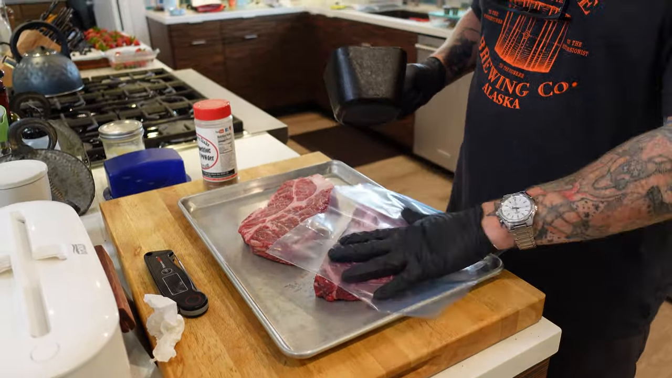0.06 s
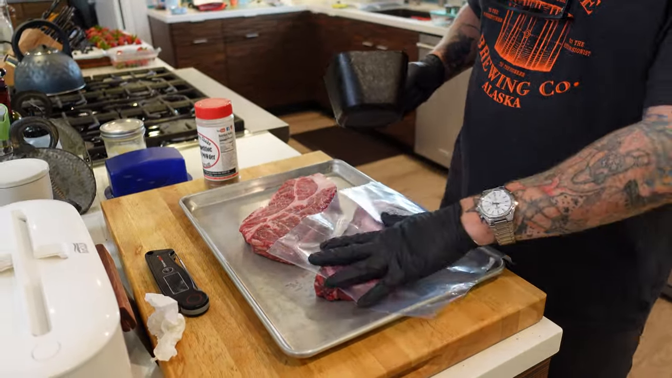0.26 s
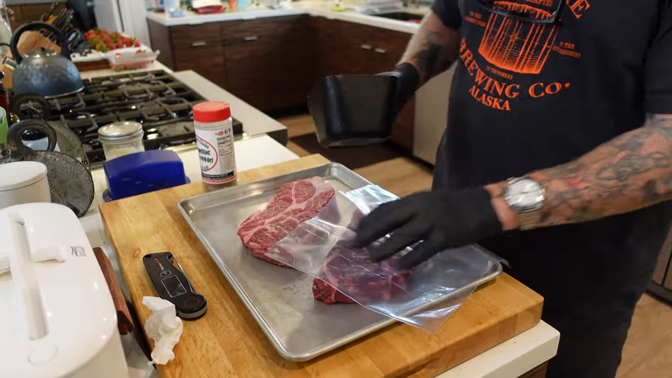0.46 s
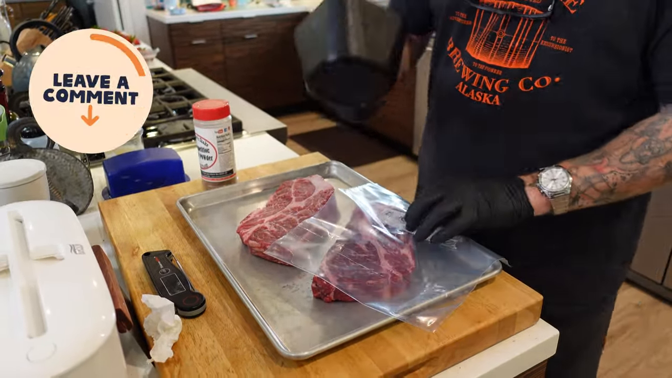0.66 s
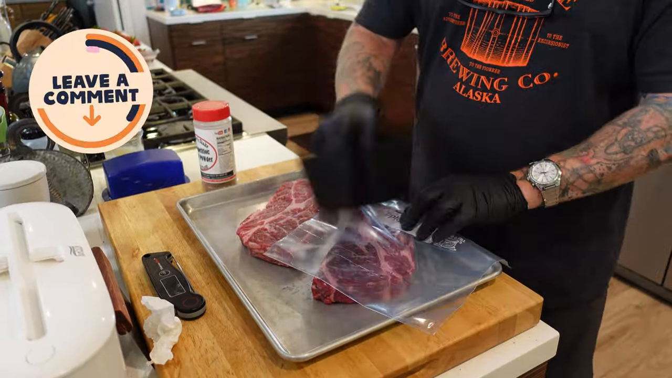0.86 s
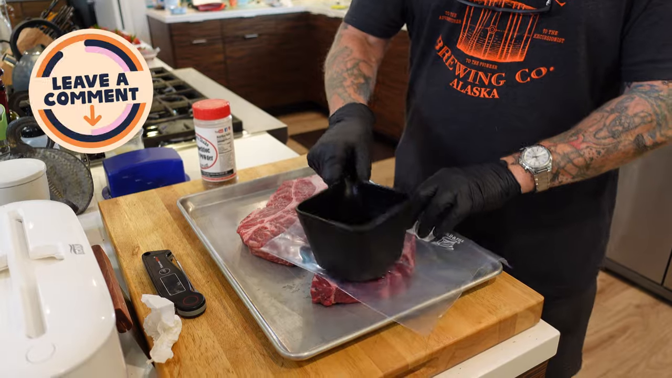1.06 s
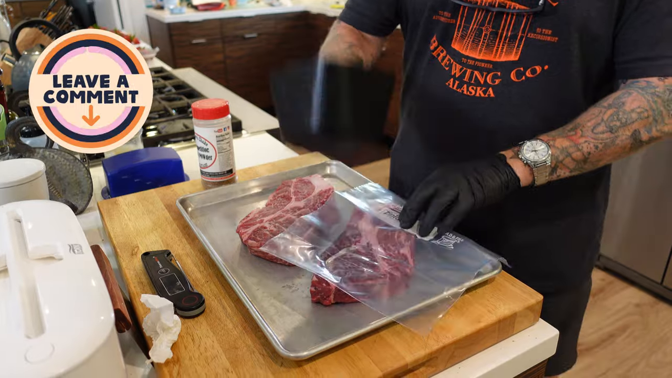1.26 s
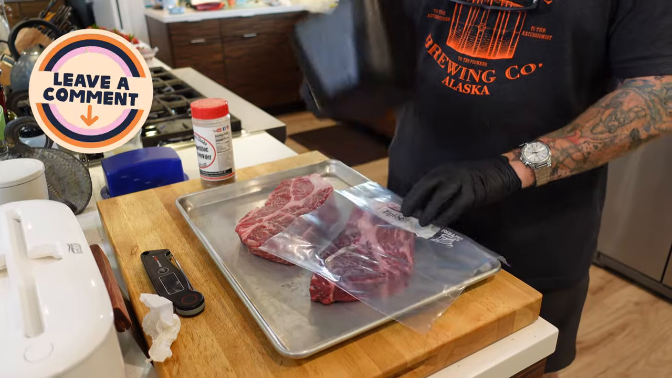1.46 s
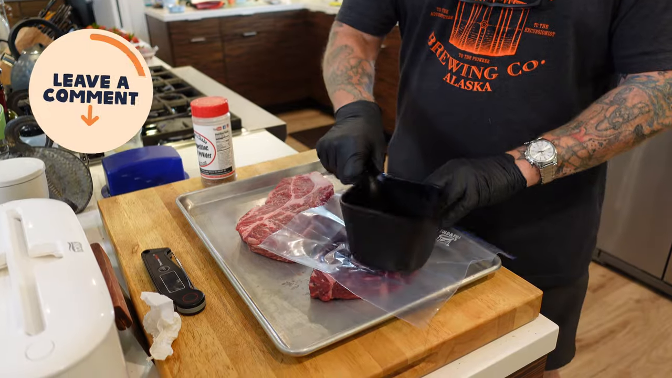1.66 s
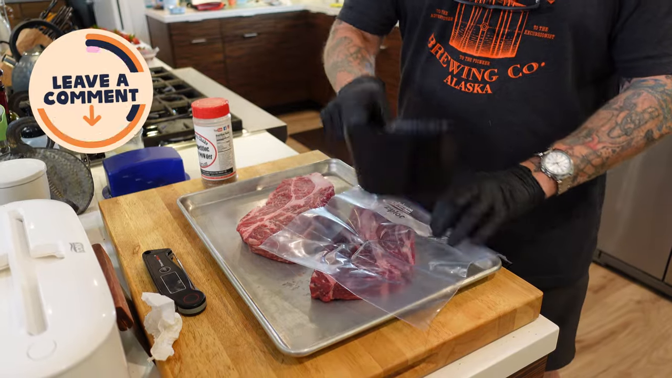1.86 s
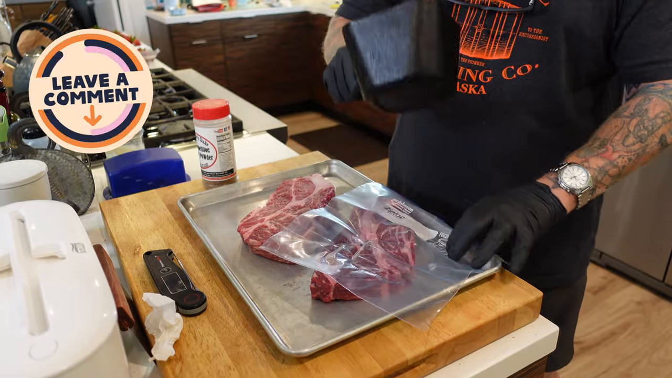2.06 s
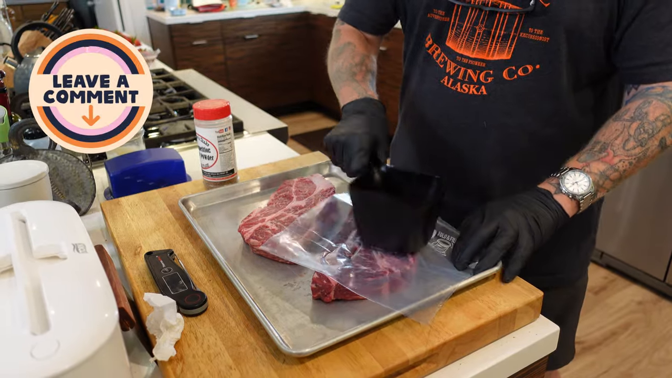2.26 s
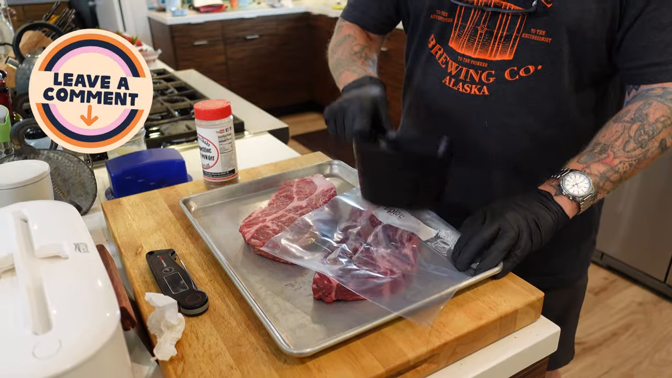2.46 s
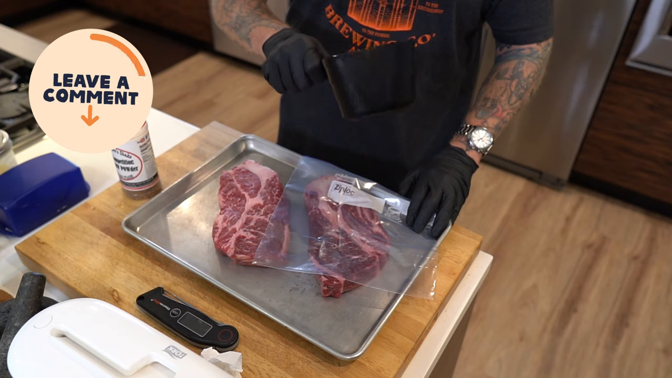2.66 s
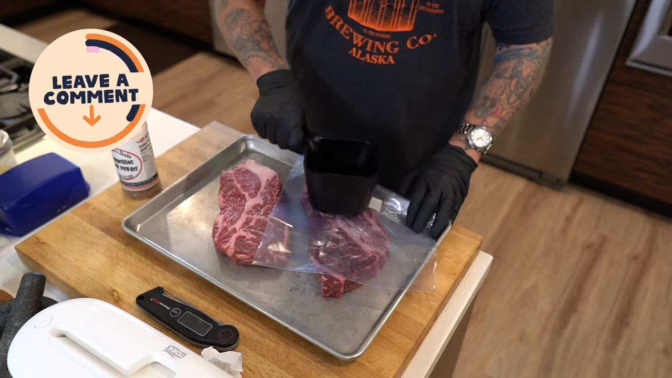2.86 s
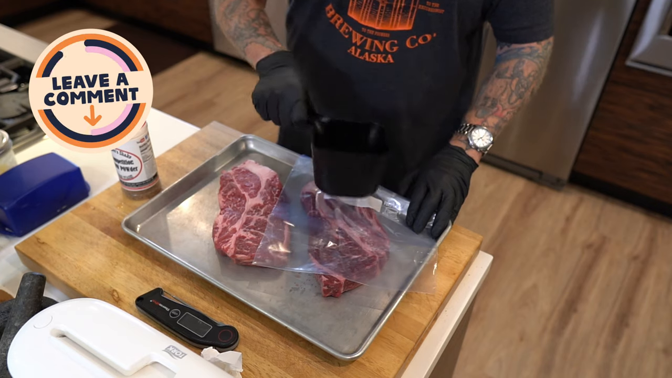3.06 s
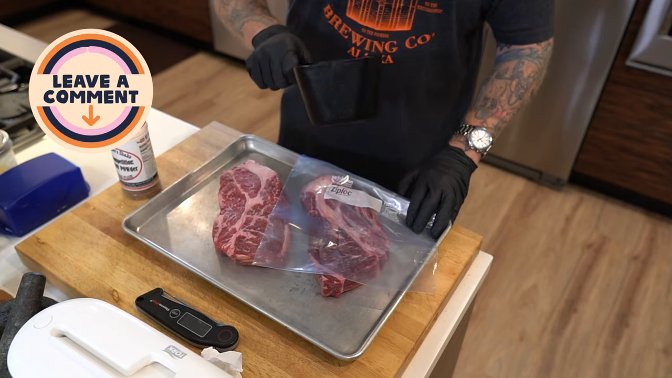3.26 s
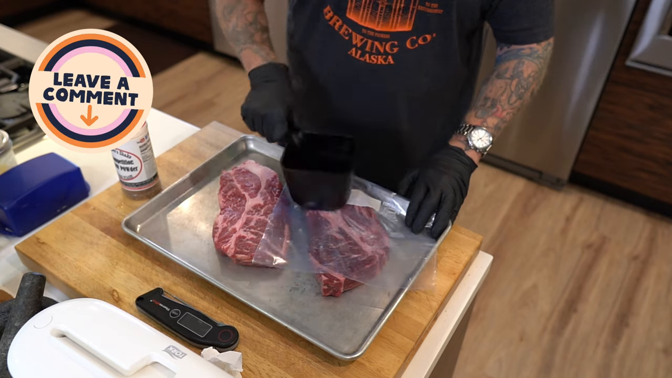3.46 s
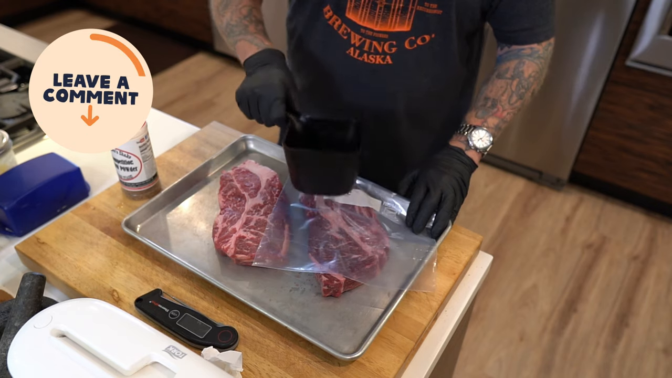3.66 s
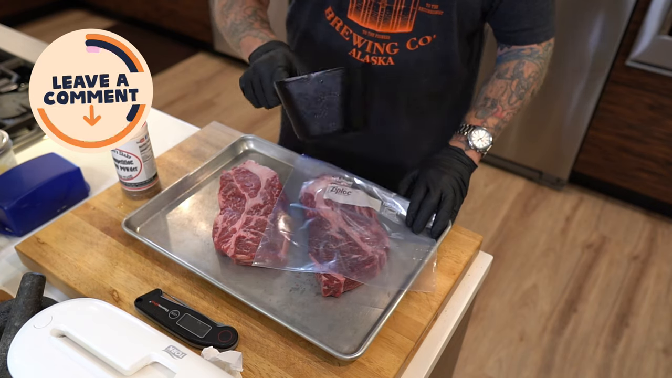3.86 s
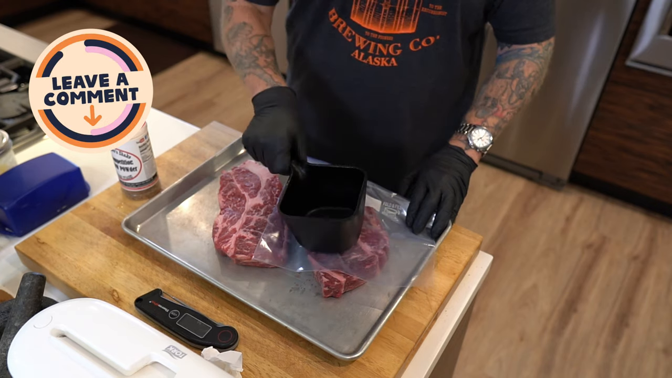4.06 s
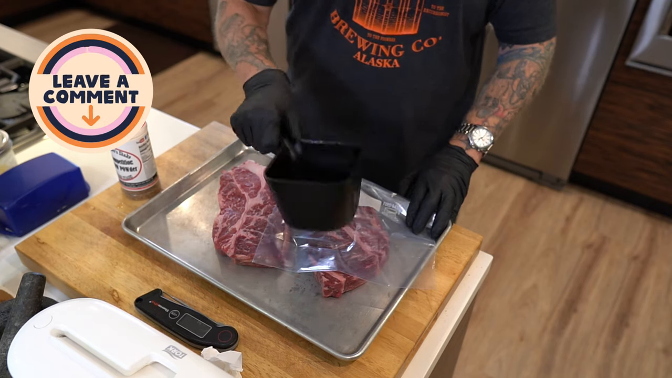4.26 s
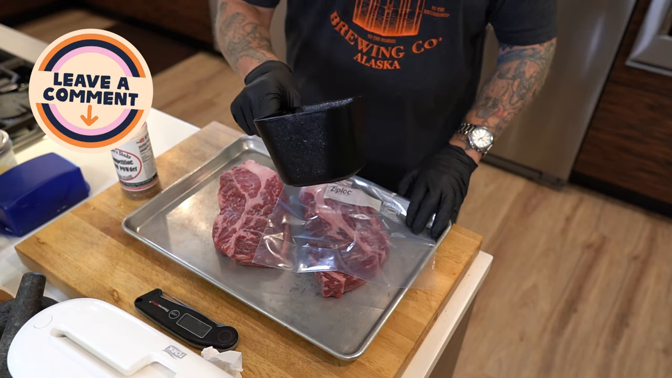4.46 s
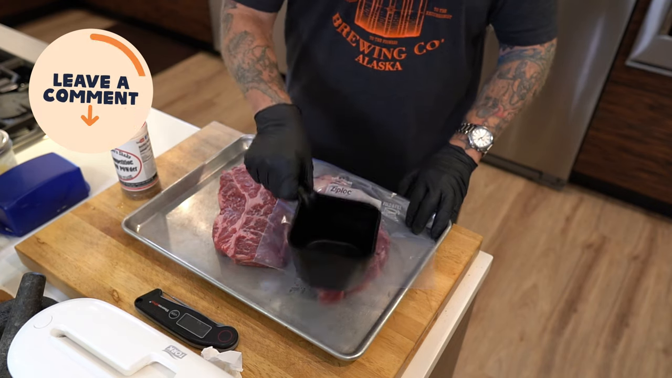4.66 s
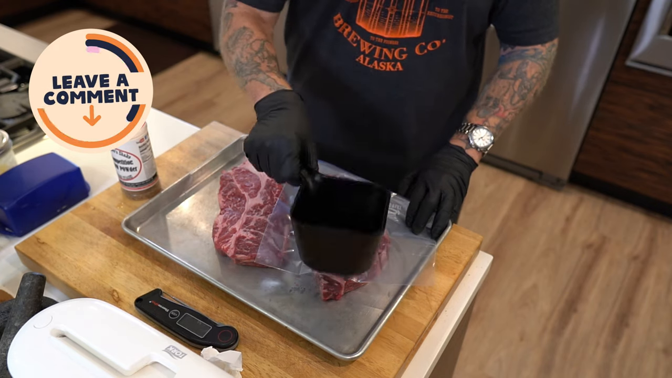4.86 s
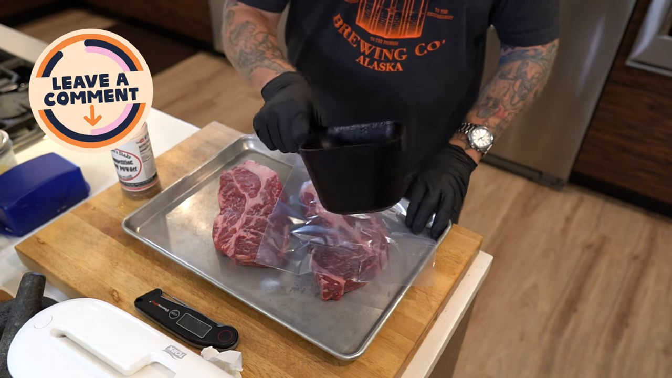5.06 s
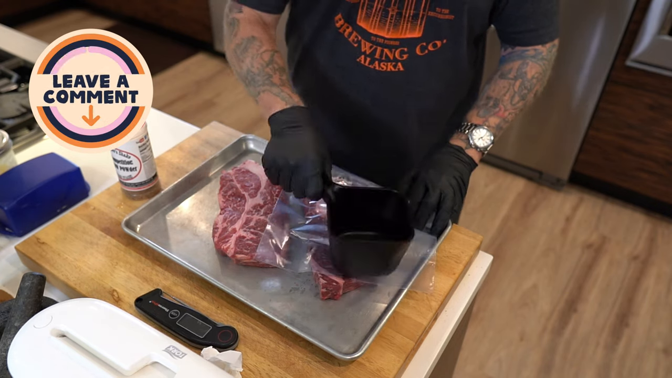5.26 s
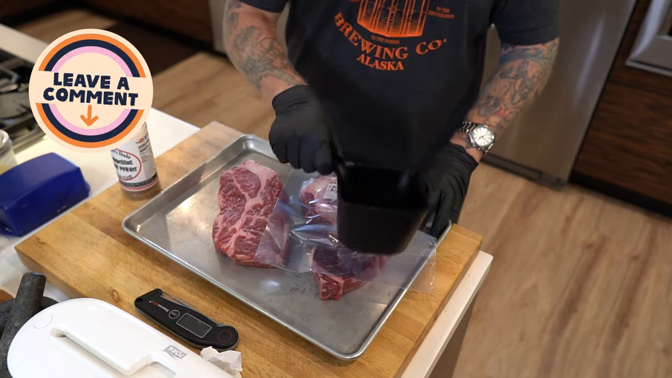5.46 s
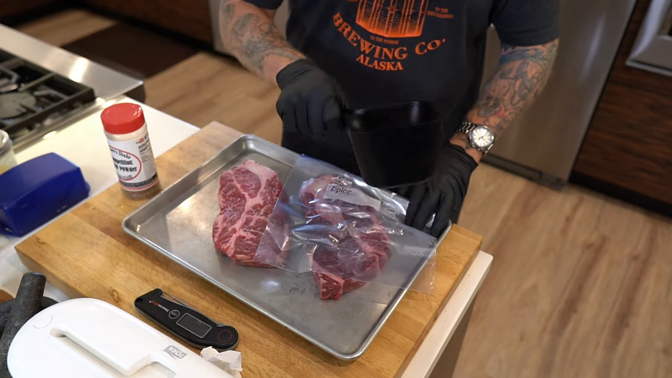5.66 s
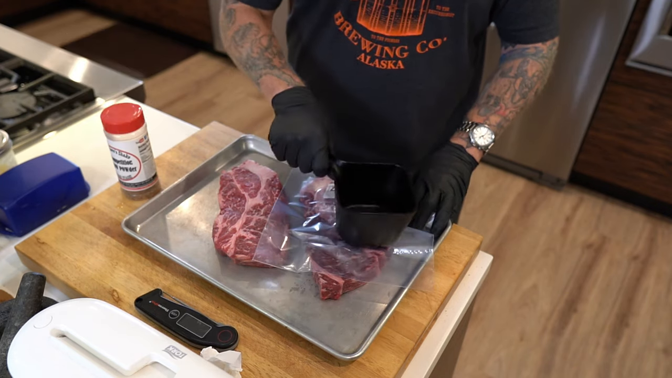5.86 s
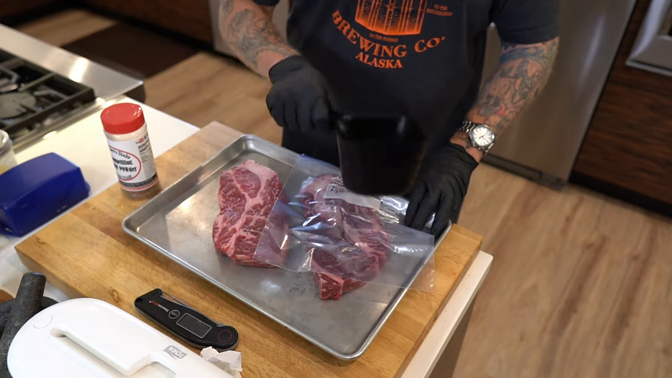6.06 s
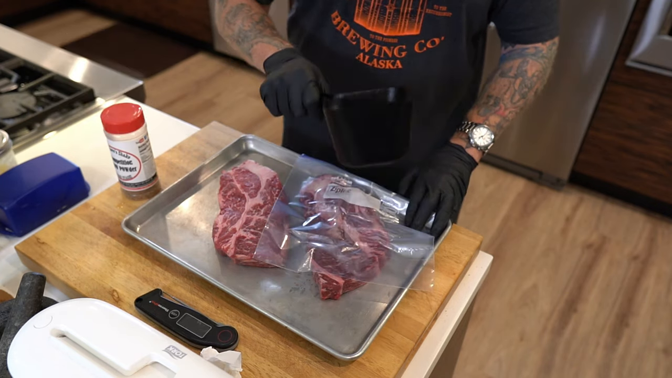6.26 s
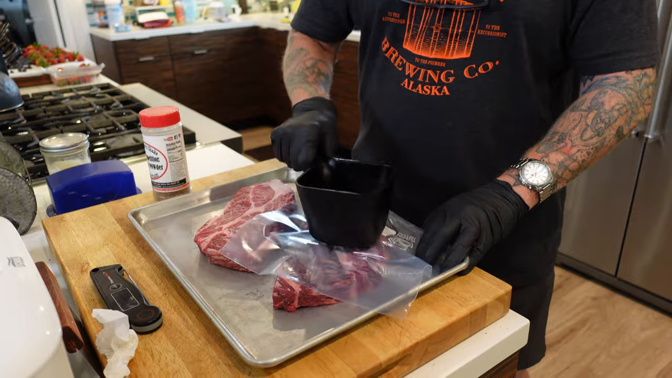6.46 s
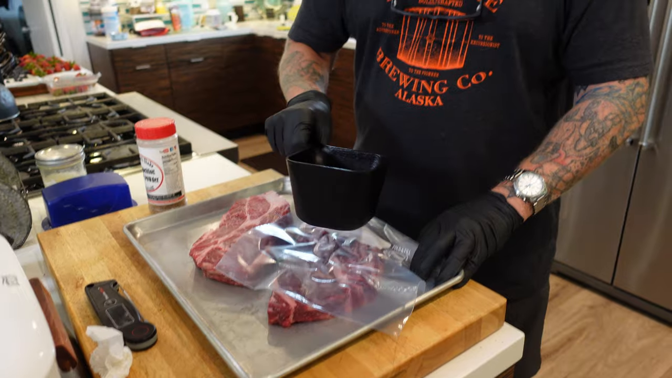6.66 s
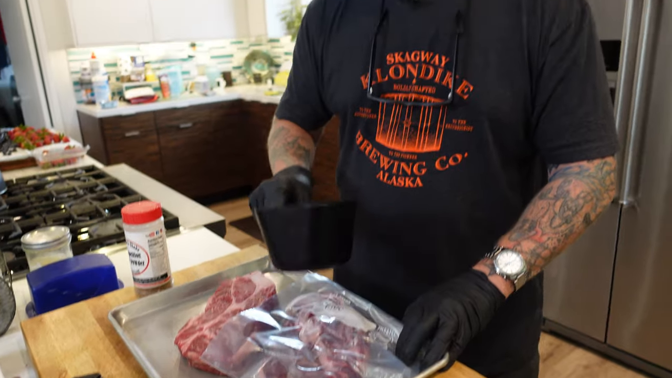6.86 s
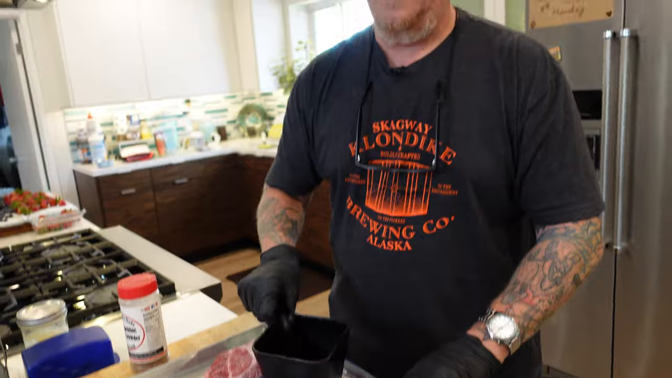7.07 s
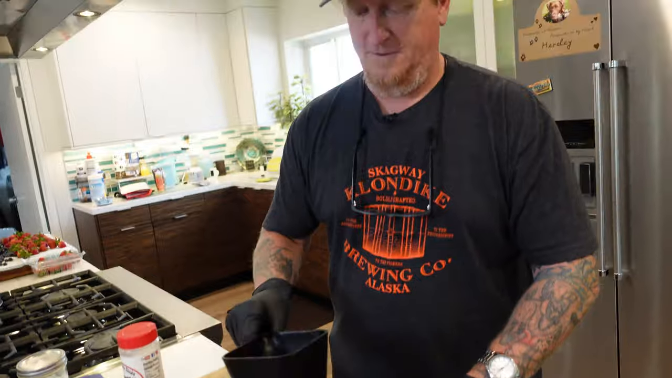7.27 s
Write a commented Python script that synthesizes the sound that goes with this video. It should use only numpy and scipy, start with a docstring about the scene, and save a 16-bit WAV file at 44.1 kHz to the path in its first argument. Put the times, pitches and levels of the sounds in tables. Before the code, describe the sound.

A quiet kitchen with a low, steady background rush is heard from close by. In the first half second a gloved hand rustles over a plastic bag, with small crinkles and a soft bump of the wooden board. At about 0.9 seconds an iron pot starts pounding bagged steaks on a metal sheet pan. Eleven heavy blows fall evenly, about 0.6 seconds apart, the last near 6.9 seconds and the hardest near 3.4. Each combines a crack of plastic, a clap of trapped air, a dull meaty smack, a damped pan knock and a low boom from the counter, with a faint iron ring and short room reverberation. The bag crinkles between hits, most clearly around 2.1, 5.3 and 6.5 seconds. From about 5.7 seconds a faint, thin, whistling hiss flutters underneath, spurting briefly around 6.2 seconds and lasting until the end at about 7.4 seconds.

```python
"""A glove rustles over a plastic bag in a quiet kitchen; then come eleven evenly paced, heavy blows.
An iron pot pounds bagged steaks on a sheet pan that lies on a wooden board. Each impact crushes the
film, claps out the trapped air, smacks the meat and excites damped modes of pan, pot, board and counter.
The room reverberates, the bag crinkles between blows, and a thin hiss sets in near the end."""
import sys
import numpy as np
from scipy import signal
from scipy.fft import rfft, irfft, next_fast_len
from scipy.io import wavfile
from scipy.ndimage import uniform_filter1d

SR = 44100
rng = np.random.default_rng(int(sys.argv[2]) if len(sys.argv) > 2 else 0)


def put_to_file(sound):
    """Save the sound as 16-bit audio at rate SR, in the file named by the first command-line argument."""
    columns = np.atleast_2d(sound).T  # one column per channel
    safe = np.clip(columns, -1, 1)
    whole_steps = np.round(safe * 32767)
    wavfile.write(sys.argv[1], SR, whole_steps.astype(np.int16))


N = 322646

# Spectral shapes (f/Hz, relative density/dB)
RUSH_SPECTRUM = [(25, -2), (60, -2), (85, -8.5), (120, 1), (168, 1), (195, -16), (228, 1), (277, -9.5),
                 (347, -4.5), (400, -10.5), (1400, -19.5), (2670, -29), (3950, -30.5), (5700, -32),
                 (11000, -33.5), (16000, -38.5)]
GLOVE_SPECTRUM = [(180, -23.5), (300, -5), (450, -5.5), (700, -3), (1050, -0.5), (2000, -6.5), (4000, -17),
                  (5000, -19), (7000, -13), (9000, -18), (11500, -24.5), (15500, -24.5)]
SLACK_CREASE_SPECTRUM = [(300, -14.5), (700, -7.5), (1150, 9), (1700, -0.5), (2600, -4), (8000, -47)]
TAUT_CREASE_SPECTRUM = [(1000, -13.5), (2200, -2), (3600, -0.5), (5000, -9), (7500, -14), (11000, -22.5),
                        (16000, -18)]
FILM_SPECTRUM = [(300, -1.5), (1000, 2.5), (2000, 2), (2700, -1), (3800, -1.5), (5000, -1.5), (6100, -9.5),
                 (7600, -3), (8800, -10.5), (10500, -7), (13000, -9), (16000, -12.5)]
MEAT_SPECTRUM = [(60, -16.5), (150, -5.5), (250, -3), (400, -1), (700, -6.5), (1000, -3.5), (2000, -17.5),
                 (6000, -52.5)]
# Slides of the glove (t/s, duration/s, level/dB)
GLOVE_STROKES = [(0, 0.45, -44), (0.128, 0.019, -50), (0.587, 0.063, -62.5), (1.929, 0.055, -55),
                 (2.081, .1, -51)]
# Creases snapping over (t/s, level/dB, tautness/0-1)
CREASE_SNAPS = [(.025, -36, 0.4), (.148, -41, .15), (.249, -47, .1), (0.29, -48, .15), (1.4958, -45, 0.07),
                (2.029, -41.5, 0.16), (2.1051, -39.5, 0.3), (2.146, -40.5, 0.92), (2.532, -54, 0.8),
                (5.31, -33, 0.84), (5.905, -43, 0.97), (6.49, -41, .7), (6.531, -44, 0.97),
                (6.661, -45.5, 0.75)]
# Reverberation time of the kitchen (f/Hz, T60/s)
ROOM_DECAY = [(100, 1), (250, 0.6), (600, 0.53), (1500, 0.56), (4000, 0.53), (8000, 0.47), (15000, .31)]
# Colour of the reverberation (f/Hz, level/dB)
ROOM_COLOUR = [(60, -9), (200, -0.5), (350, 0), (500, -3.5), (750, -3), (1000, -3), (1350, -5), (2500, -2),
               (5000, -5), (9000, -0.5), (15000, -2)]
# Blows (t/s, force/dB, flatness of landing/dB, film crack/dB, low clap f/Hz, high clap f/Hz,
# film pop f/Hz, pot ring/dB, lead of first touch/s)
BLOWS = [(0.85, -2.5, -0.5, -0.5, 703, 1240, 3380, -21, .0066),
         (1.565, 1, -0.5, .5, 814, 1180, 10060, -7.5, 0.0043),
         (2.1999, 0.5, 0.5, 0, 593, 1380, 11200, -19.5, 0.0069),
         (2.831, 1.5, 1.5, -1.5, 723, 1180, 4810, -22, 0.006),
         (3.431, 4, -2.5, 1, 574, 1346, 5120, -16, 0.0051),
         (4.027, .5, 2.5, 2, 687, 1182, 11850, -19.5, .0091),
         (4.6499, -4.5, 4, 2, 725, 1650, 7400, -20.5, 0.0052), (5.25, -1, 2, 0, 723, 957, 4420, -23, 0.018),
         (5.789, -3, -5.5, 0.5, 747, 1160, 3870, -29, .0066),
         (6.387, -2, -0.5, -1, 656, 1308, 3260, -20.5, 0.0076),
         (6.945, -2, 0, -2.5, 730, 1310, 4560, -20.5, 0.0062)]
# Parts of a blow, by name (level at middling force/dB, force slope/(dB/dB), flatness slope/(dB/dB))
BLOW_PARTS = {"crack": (-19, 0.22, 0), "pop": (-28, .1, .1), "low clap": (-17.5, 1, 0.99),
              "high clap": (-17.5, 1.4, 0), "smack": (-20, 0.89, 0), "pan": (-20.5, 0.57, 1.6),
              "boom": (-15.5, 1, 0), "room": (-5.5, 0.6, 0)}
# Modes of the iron pot, and of the counter with the air around it (f/Hz, relative level/dB, T60/s)
POT_MODES = [(1825, -23.5, 0.29), (1853, -21.5, 0.38), (3654, -15.5, .22), (4500, -29, .3)]
COUNTER_MODES = [(50.3, .5, .44), (69, 7.5, .115), (115.5, -7, .34), (125, -12.5, .6), (165, -19, .57)]
# Upper resonances of the hiss (f/Hz, width/Hz, relative level/dB)
HISS_HIGH_BANDS = [(6600, 1300, -11), (9580, 620, -3), (11600, 1200, -6.5), (13400, 1400, -9.5)]
# Spurts of hiss (t/s, duration/s, low band level/dB, high bands level/dB)
HISS_SPURTS = [(6.118, 0.13, -57, -53.5), (6.218, .17, -57.5, -47), (6.702, .06, -69, -63),
               (6.812, 0.058, -63.5, -68.5), (7.27, .04, -59, -58)]


def amp(db):
    """Amplitude ratio of a level in decibels."""
    return 10 ** (np.asarray(db) / 20)


def unit(x):
    """Normalisation to rms 1."""
    return x / np.sqrt(np.mean(x ** 2) + 1e-20)


def burst(x):
    """Normalisation to the energy of 20 ms at rms 1."""
    return x / np.sqrt(np.sum(x ** 2) / (.02 * SR) + 1e-20)


def along(points, hz):
    """Interpolation of (f/Hz, value) points over log frequency."""
    f, values = np.transpose(points)
    return np.interp(np.log(hz + 1), np.log(f), values)


def filtered(x, response):
    """Convolution: the spectrum of x times a frequency response."""
    size = 2 * next_fast_len(len(x))
    return irfft(rfft(x, size) * response(np.fft.rfftfreq(size, 1 / SR)), size)[:len(x)]


def coloured(x, points):
    """Minimum-phase (causal) filtering to a shape of (f/Hz, level/dB) points."""
    def response(hz):
        cepstrum = irfft(np.log(amp(along(points, hz))))
        half = len(cepstrum) // 2
        cepstrum[1:half] *= 2
        cepstrum[half + 1:] = 0
        return np.exp(rfft(cepstrum))
    return filtered(x, response)


def resonance(x, hz, width):
    """Resonance with steep skirts: two band-passes in series, normalised in energy."""
    for band in (width, 3 * width):
        x = filtered(x, lambda f: 1j * f * band / (hz * hz - f * f + 1j * f * band))
    return burst(x)


def add(track, start_s, x):
    """Superposition of x on the track."""
    start = max(round(start_s * SR), 0)
    track[start:start + len(x)] += x[:len(track[start:])]


def contact(t, rise, fall):
    """Force pulse: exponential growth until t = 0, then exponential release."""
    return np.exp(np.minimum(t, 0) / rise - np.maximum(t, 0) / fall)


def mode(t, hz, t60, rise):
    """Damped oscillation, excited at t = 0."""
    t = np.maximum(t, 0)
    return np.sin(2 * np.pi * hz * t) * 10 ** (-3 * t / t60) * (1 - np.exp(-t / rise))


def crackle(n, spiky_db):
    """Noise with log-normal amplitude modulation: dense tiny collapses of uneven size."""
    sizes = unit(uniform_filter1d(rng.standard_normal(n), size=12))
    return rng.standard_normal(n) * amp(spiky_db * sizes)


def envelope(start, length, attack, sag_db_per_s, release):
    """Linear attack with exponential sag and release; times in seconds."""
    t = np.maximum(np.arange(N) / SR - start, 0)
    return np.minimum(t / attack, 1) * amp(-sag_db_per_s * t) * np.exp(-np.maximum(t - length, 0) / release)


def room_rush():
    """Stationary noise: a low rush, and the drone of the room's lowest resonance."""
    rush = amp(-55.5) * unit(coloured(rng.standard_normal(N), RUSH_SPECTRUM))
    drone = amp(-58) * unit(resonance(rng.standard_normal(N), hz=60, width=23))
    return rush + drone


def glove_rustle():
    """Friction noise of the glove sliding over the bag."""
    sliding = sum(amp(db) * envelope(start, length, attack=.0084, sag_db_per_s=34, release=.025)
                  for start, length, db in GLOVE_STROKES)
    return sliding * unit(coloured(crackle(N, spiky_db=4), GLOVE_SPECTRUM))


def bag_creases():
    """Buckling: creases snap over, brighter when taut, and tick as the film relaxes after each blow."""
    track, t = np.zeros(N), np.arange(SR // 4) / SR
    settling = [(blow[0] + rng.uniform(.096, .12), -57.5, rng.random()) for blow in BLOWS]
    for start, db, tautness in CREASE_SNAPS + settling:
        buckle = crackle(len(t), spiky_db=2) * np.exp(-t / .0018)
        slack = np.sqrt(1 - tautness) * burst(coloured(buckle, SLACK_CREASE_SPECTRUM))
        taut = np.sqrt(tautness) * burst(coloured(buckle, TAUT_CREASE_SPECTRUM))
        snap = amp(db) * (slack + taut)
        add(track, start, snap)
        add(track, start, reverberation(snap, wet_db=-7.5))
    return track


def reverberation(x, wet_db):
    """Diffuse field: echoes from cabinets and walls blur the spectrum of x and decay band by band."""
    power = np.cumsum(np.abs(rfft(x, SR)) ** 2)  # one bin per Hz
    below = lambda f: np.interp(f, np.arange(len(power)), power)
    centres = np.geomspace(40, 18000, num=50)
    spread = .14 * centres
    density = (below(centres + spread) - below(centres - spread)) / (2 * spread)
    colour_db = 10 * np.log10(density + 1e-14) + along(ROOM_COLOUR, centres)
    hz, t, noise = signal.stft(rng.standard_normal(SR), SR, nperseg=256)
    decay = 10 ** (-3 * t / along(ROOM_DECAY, hz)[:, None])
    tail = signal.istft(noise * decay, SR, nperseg=256)[1]
    tail *= 1 - np.exp(-(np.arange(len(tail)) / SR / .013) ** 2)  # echoes take time to thicken
    return amp(wet_db) * coloured(tail / np.linalg.norm(tail), np.c_[centres, colour_db])


def radiated(x, cutoff_hz):
    """Radiation efficiency: furniture is too small to radiate its slowest motion."""
    return signal.sosfilt(signal.butter(4, cutoff_hz, "highpass", fs=SR, output="sos"), x)


def board_nudge():
    """Damped rocking of the board as the hand leans on the meat."""
    t = np.arange(N) / SR
    return amp(-31) * radiated(mode(t - .238, hz=75, t60=.065, rise=.0025), cutoff_hz=37)


def glove_scuff():
    """Transient friction: a short swish as the glove lets go of the film."""
    track, t = np.zeros(N), np.arange(SR // 3) / SR
    friction = crackle(len(t), spiky_db=2) * contact(t - .015, rise=.012, fall=.066)
    add(track, .288, amp(-48) * resonance(friction, hz=3160, width=1500))
    return track


def film_crack(t, crush, levels, film_db, pop_hz):
    """Crushed film gives a broadband crack and a resonant pop; smaller blisters pop more softly."""
    slam = contact(t, rise=.002, fall=.002)
    brush = .32 * contact(t, rise=.032, fall=.012)
    crumple = crackle(len(t), spiky_db=4) * crush * (slam + brush)
    crack = amp(levels["crack"] + film_db) * burst(coloured(crumple, FILM_SPECTRUM))
    blister = crackle(len(t), spiky_db=3) * crush * slam
    pop_db = levels["pop"] + .3 * film_db - np.log2(pop_hz / 5000)  # -1 dB per octave
    return crack + amp(pop_db) * resonance(blister, pop_hz, width=.12 * pop_hz)


def air_clap(t, touch, levels, low_hz, high_hz):
    """Cavity resonance: air escaping between pot and meat rings at pitches set by its pockets' size."""
    squeeze = crackle(len(t), spiky_db=1.5) * touch * contact(t, rise=.0037, fall=.0035)
    low = amp(levels["low clap"]) * resonance(squeeze, low_hz, width=75)
    high = amp(levels["high clap"]) * resonance(squeeze, high_hz, width=.3 * high_hz)
    return low + high


def meat_smack(t, touch):
    """Inelastic impact: soft meat gives a dull burst of noise."""
    squash = crackle(len(t), spiky_db=2) * touch * contact(t - .004, rise=.0045, fall=.016)
    return burst(coloured(squash, MEAT_SPECTRUM))


def pot_ring(t):
    """Free vibration of the iron pot in inharmonic modes."""
    return sum(amp(db) * mode(t, hz, t60, rise=.00091) for hz, db, t60 in POT_MODES)


def counter_boom(t):
    """Structure-borne sound: the board bounces at once, the counter once the meat is fully pressed."""
    board = amp(12) * mode(t - .001, hz=98, t60=.054, rise=.009)
    counter = sum(amp(db) * mode(t - .028, hz, t60, rise=.003) for hz, db, t60 in COUNTER_MODES)
    return radiated(board + counter, cutoff_hz=45)


def pan_knock(t, force_db):
    """Heavily damped mode, driven through the meat; a harder press stiffens the pan and raises it."""
    return burst(mode(t - .006, hz=492.6 + 4 * force_db, t60=.05, rise=.028))


def pounding():
    """Impact excitation: force raises the levels; a flat landing traps more air and drives the pan more."""
    track, lead_s = np.zeros(N), .02
    t = np.arange(SR) / SR - lead_s  # the pot lands at t = 0
    approach = .02 * np.clip(1 + t / lead_s, 0, 1)
    onset = lambda early_s: np.clip((t + early_s) / .00035, 0, 1) + approach
    for start, force_db, flat_db, film_db, low_hz, high_hz, pop_hz, pot_db, early_s in BLOWS:
        levels = {part: base + by_force * force_db + by_flat * flat_db
                  for part, (base, by_force, by_flat) in BLOW_PARTS.items()}
        touch = onset(early_s)  # the pot brushes the loose film first
        crush = onset(min(early_s, .0065))  # the film cracks only just before the landing
        slap = (film_crack(t, crush, levels, film_db, pop_hz)
                + air_clap(t, touch, levels, low_hz, high_hz)
                + amp(levels["smack"]) * meat_smack(t, touch)
                + amp(levels["pan"]) * pan_knock(t, force_db))
        ringing = amp(pot_db) * pot_ring(t) + amp(levels["boom"]) * counter_boom(t)
        add(track, start - lead_s, slap + ringing)
        add(track, start, reverberation(slap, levels["room"]))
    return track


def hiss(steady_from_s=5.72):
    """Narrow-band noise, modulated in amplitude: a thin, whistling hiss that flutters and spurts."""
    noise = rng.standard_normal(N)
    flutter = amp(1.9 * unit(uniform_filter1d(rng.standard_normal(N), size=900)))
    low = unit(resonance(noise, hz=2845, width=410))
    high = unit(sum(amp(db) * resonance(noise, hz, width) for hz, width, db in HISS_HIGH_BANDS))
    whistle = unit(resonance(noise, hz=9730, width=240))
    steady = (np.arange(N) / SR > steady_from_s) * (amp(-67.5) * low + amp(-70) * whistle)
    spurts = sum(envelope(start, length, attack=.019, sag_db_per_s=77, release=.02)
                 * (amp(low_db) * low + amp(high_db) * high)
                 for start, length, low_db, high_db in HISS_SPURTS)
    return flutter * (steady + spurts)


def scene():
    """Superposition of all sources in one channel."""
    kitchen_work = pounding() + bag_creases() + glove_rustle() + glove_scuff() + board_nudge()
    return (kitchen_work + hiss() + room_rush())[None]


def record(dry):
    """Soft saturation rounds the loudest peaks; a steep low-pass limits the band."""
    cutoff_hz = 15850
    rounded = dry[0] / (1 + np.abs(dry[0]) ** 6) ** (1 / 6)
    return filtered(rounded, lambda hz: 1 / np.sqrt(1 + (hz / cutoff_hz) ** 260))[None]


dry = scene()
out = record(dry)
put_to_file(out)
```